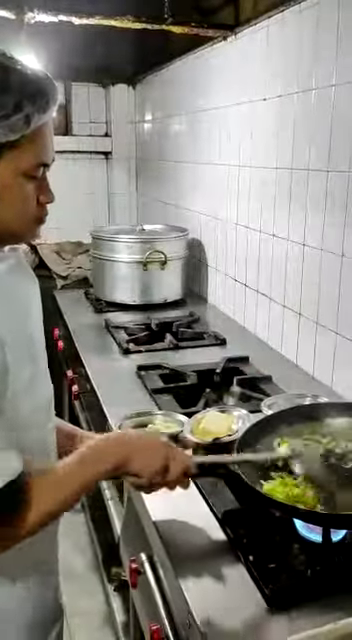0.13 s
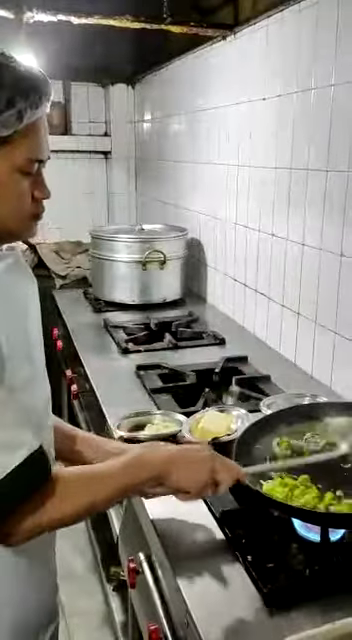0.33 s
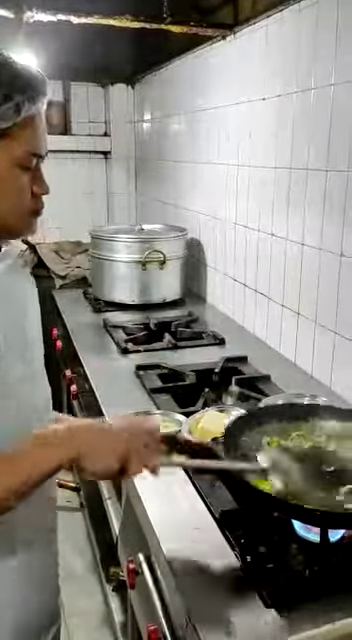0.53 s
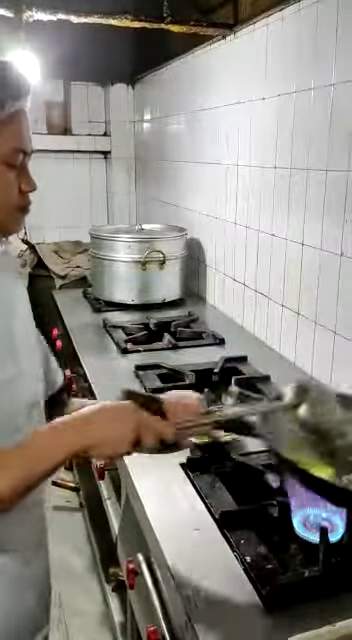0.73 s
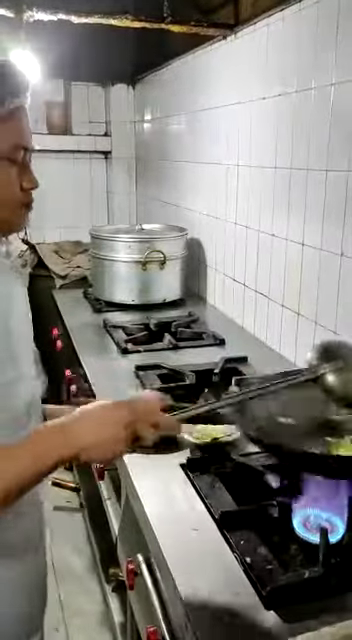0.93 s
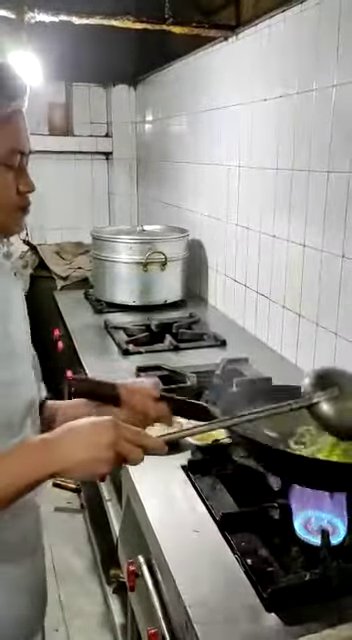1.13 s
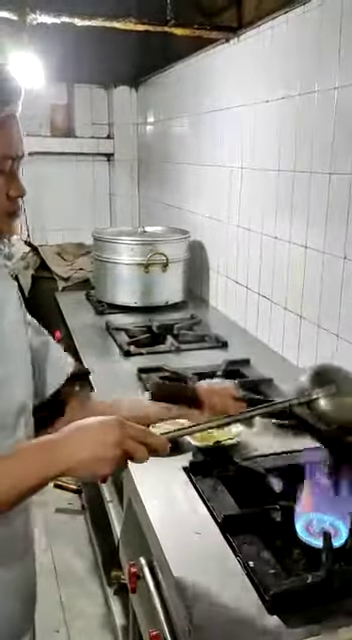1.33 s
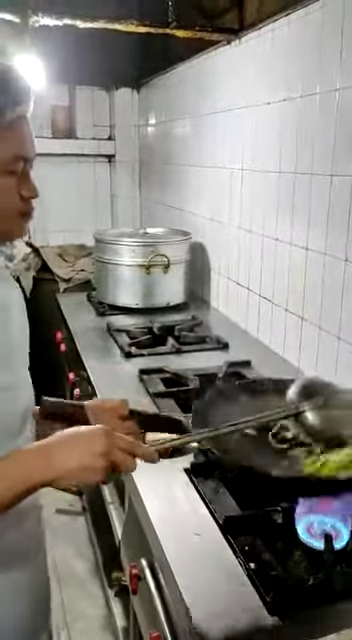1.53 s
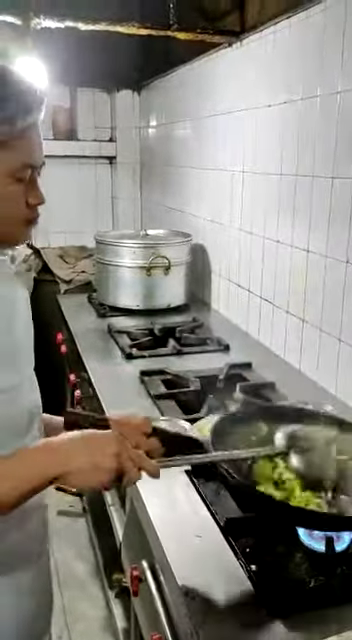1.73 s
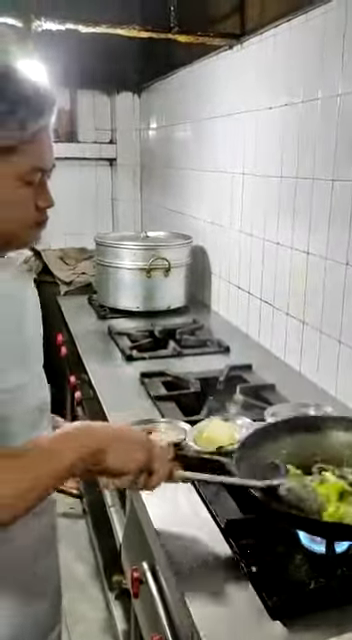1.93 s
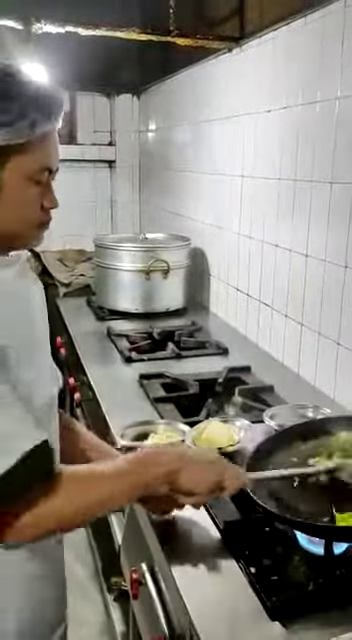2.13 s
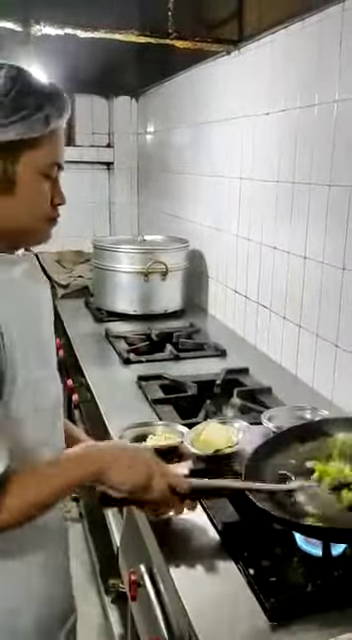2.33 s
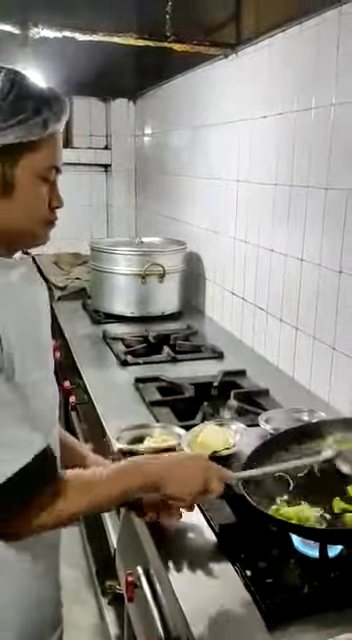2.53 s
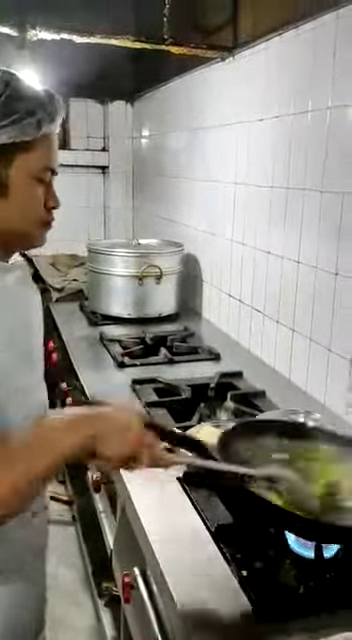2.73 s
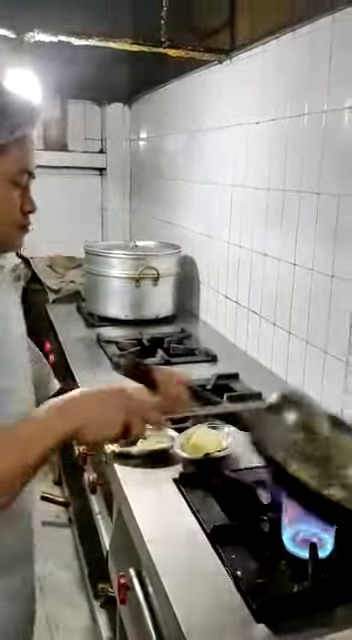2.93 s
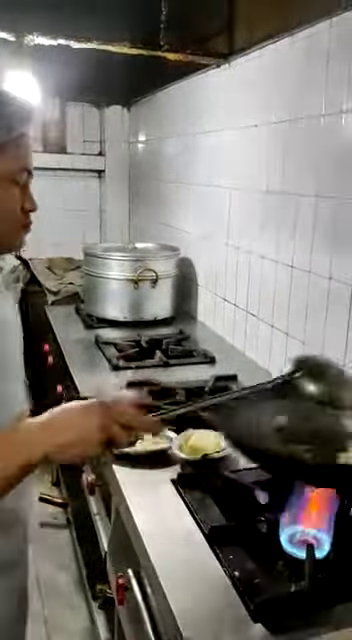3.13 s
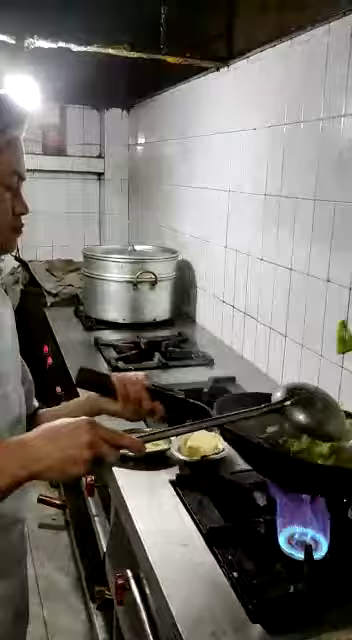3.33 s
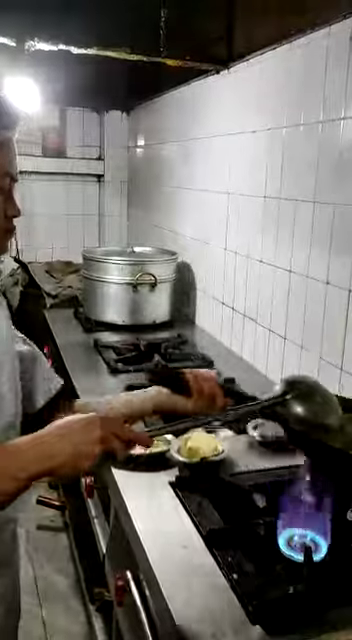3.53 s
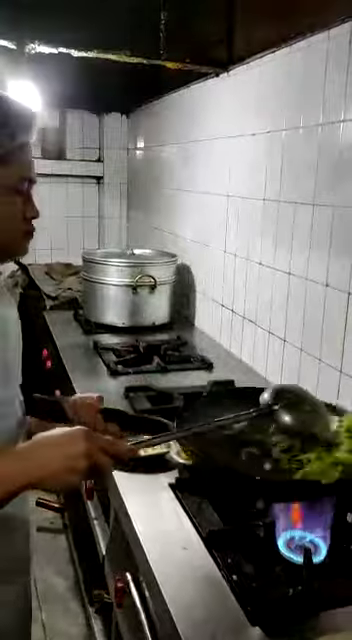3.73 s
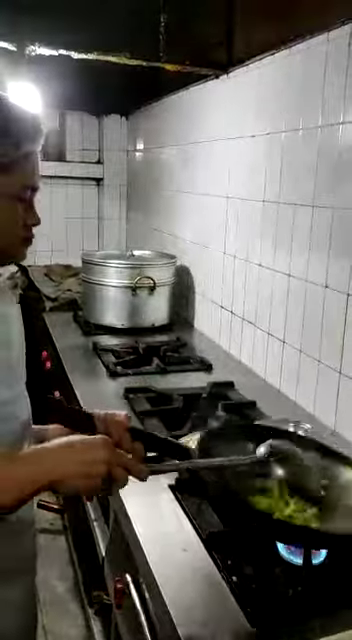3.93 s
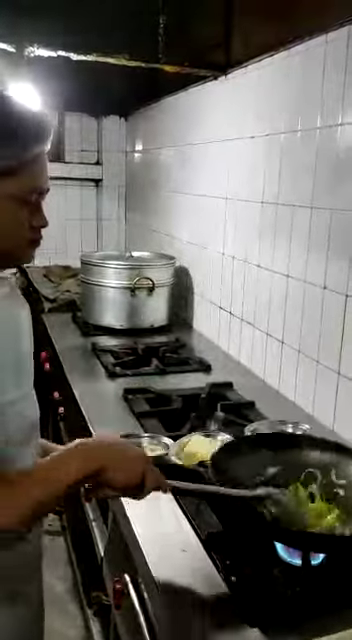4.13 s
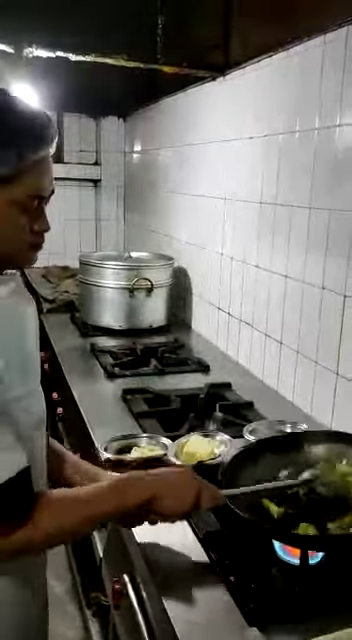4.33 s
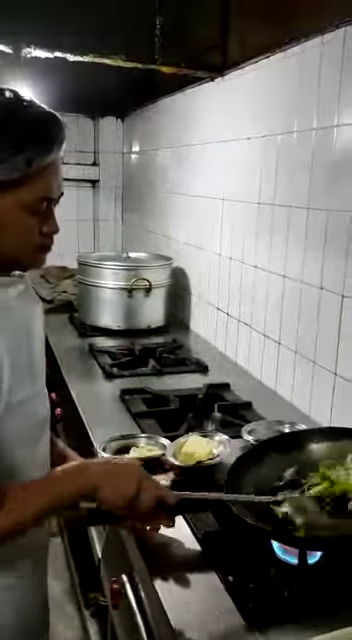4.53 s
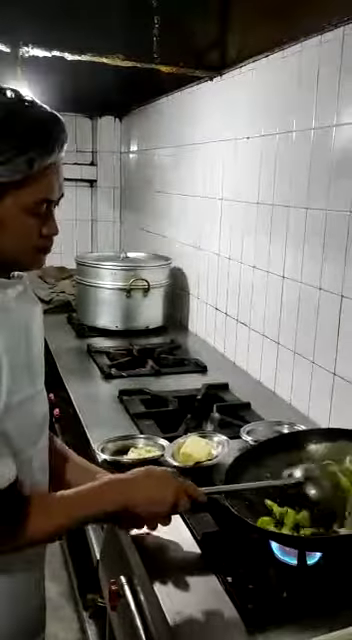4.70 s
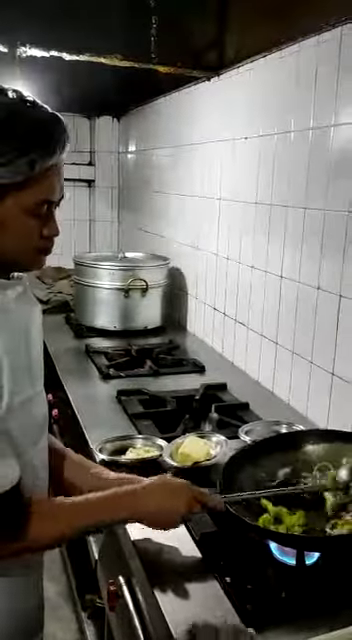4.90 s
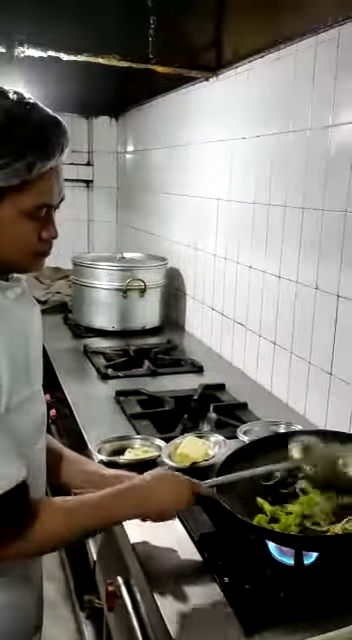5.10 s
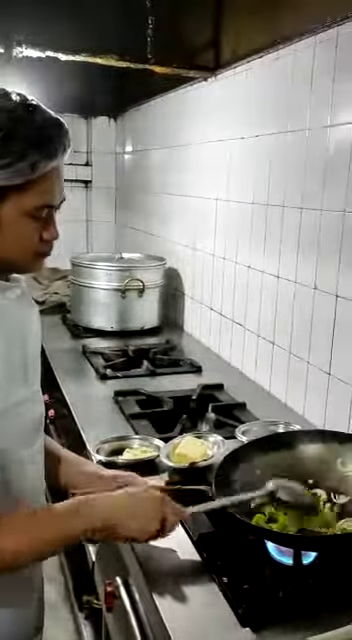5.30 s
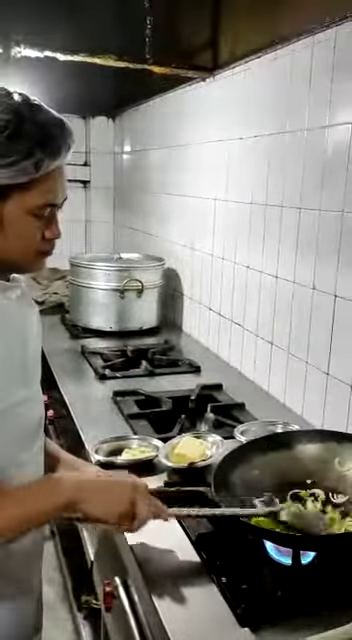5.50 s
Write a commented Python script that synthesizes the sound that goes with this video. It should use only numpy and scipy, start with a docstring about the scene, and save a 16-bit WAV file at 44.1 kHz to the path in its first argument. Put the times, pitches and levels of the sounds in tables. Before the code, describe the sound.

A bright crackling sizzle and gas hiss run throughout, dipping at times. A steel wok scrapes and thuds on the stove ring at around 0.7 seconds, again near 1.9, then in busier, louder clatters near 2.8 and 4.05, with smaller knocks near 5. A ladle chatters and clinks above it. Close stereo microphone, small hard tiled kitchen, faint motor throb early.

```python
"""A steel wok is dragged and tossed on a stove ring: it judders and rings low, as rough pushes stir its modes.
A steel ladle chatters and clinks high, from random clicks and short blows, and tiled walls echo the steel.
Frying food and the gas jet hiss on top, made of shaped noise with lulls, short bursts and bursting drops.
Outside the room a slow motor throbs for the first seconds, a few wavering sine tones.
Under it all lies the rumble of the kitchen, shaped noise that swells slowly."""
import sys
import numpy as np
from scipy import signal
from scipy.fft import rfft, irfft, next_fast_len
from scipy.io import wavfile
from scipy.ndimage import uniform_filter1d

SR = 44100
rng = np.random.default_rng(int(sys.argv[2]) if len(sys.argv) > 2 else 0)


def transcribe(signal):
    """Save signal, clipped to [-1, 1], as a 16-bit WAV file at the path in sys.argv[1]."""
    frames = np.atleast_2d(signal).T
    limited = np.clip(frames, -1, 1)
    pcm = np.round(limited * 32767).astype(np.int16)
    wavfile.write(sys.argv[1], SR, pcm)


N = 245195  # length in samples


def undb(db):
    """Turns a level in dB into a gain."""
    return 10 ** (np.asarray(db) / 20)


def unit(x):
    """Scales a sound to an rms (average strength) of 1."""
    return x / np.sqrt(np.mean(x ** 2))


def columns(table):
    """Draws straight lines between a table's rows, one curve for each column after the time."""
    seconds, *rest = np.transpose(table)
    return [np.interp(np.arange(N) / SR, seconds, column) for column in rest]


def walk(rate):
    """Smooth random wandering with a spread near 1: levels held for 1 / rate seconds, averaged twice."""
    hold = int(SR / rate)
    steps = np.repeat(rng.standard_normal(N // hold + 1), hold)
    smooth = uniform_filter1d(uniform_filter1d(steps, hold), hold)
    return 1.66 * smooth[:N]


def grains(rate, spread_db):
    """Random clicks, about rate of them a second, most small and a few large; rms 1."""
    when, sign, size = rng.random(N), rng.standard_normal(N), rng.exponential(size=N)
    height = np.clip(sign, -2, 2) * undb(spread_db * np.minimum(size, 4))
    return unit((when < rate / SR) * height)


def colour(x, points):
    """Shapes the spectrum by (Hz, dB) points without sounding early: nothing is heard before a blow."""
    hz, db = np.transpose(points)
    size = 2 * next_fast_len(N // 2 + 1)
    f = np.maximum(np.arange(size // 2 + 1) * SR / size, 1)
    curve_db = np.interp(np.log(f), np.log(np.maximum(hz, 1)), db)
    # folding the cepstrum (transform of the log spectrum) gives a minimum-phase filter
    cepstrum = irfft(np.log(undb(curve_db)), size)
    cepstrum[1:size // 2] *= 2
    response = np.exp(rfft(cepstrum[:size // 2 + 1], size))
    return irfft(rfft(x, size) * response, size)[..., :N]


def strokes(table, fade_db_per_s):
    """Gains of strokes that rise, hold and fade; columns after the level are relative to it."""
    power, t = 0, np.arange(N) / SR
    for start, rise, hold, db, *rest in table:
        attack = np.clip((t - start) / max(rise, .002), 0, 1)
        fade = undb(-fade_db_per_s * np.maximum(t - start - rise - hold, 0))
        levels = undb([[db]] + [[db + r] for r in rest])
        power = power + (attack * fade) ** 2 * levels ** 2
    return np.sqrt(power)


def blows(table, relative=False, snap=0):
    """A rough push at each event, sudden and dying away over its contact length; snap adds a first click."""
    push, clicks = np.zeros(N), np.zeros(N)
    for s, db, relative_db, length_s in table:
        i = int(s * SR)
        t = np.arange(min(N - i, SR // 4)) / SR
        gain = undb(db + relative * relative_db)
        push[i:i + len(t)] += gain * np.exp(-t / max(length_s, .001))
        clicks[i] = snap * gain
    return push * rng.standard_normal(N) + clicks


def favoured(force, events, lift_db, width_hz):
    """Adds a resonance at the frequency favoured by the latest contact; lift_db is its own gain."""
    events = sorted(events)
    starts = [int(s * SR) for s, _ in events] + [N]
    out = force.copy()
    for (_, hz), a, b in zip(events, starts, starts[1:]):
        peak = signal.iirpeak(hz, hz / width_hz, fs=SR)
        out[a:b] += undb(lift_db) * signal.lfilter(*peak, force[a:b])
    return out


def ring(force, modes, drift):
    """Modes die away, detuned by the shifting load, with a moving phase between channels.

    Each mode is (Hz, dB, seconds to fall 60 dB); steady noise of rms 1 gives about rms 1 before the high-pass.
    """
    out, power = 0, 0
    for hz, db, t60 in modes:
        pole = np.exp(2j * np.pi * hz / SR - np.log(1000) / (t60 * SR))
        gain = undb(db) * np.sqrt(2 * (1 - abs(pole) ** 2))
        detune = 2 * np.pi * np.cumsum(drift * hz * walk(25)) / SR
        apart = min(hz / 700, 2.5) * walk(4)  # phase between left and right
        z = signal.lfilter([gain], [1, -pole], force)
        left = (z * np.exp(1j * detune)).imag
        right = (z * np.exp(1j * (detune + apart))).imag
        out = out + np.array([left, right])
        power += undb(db) ** 2
    high_pass = signal.butter(4, 70, "high", fs=SR, output="sos")
    return signal.sosfilt(high_pass, out) / np.sqrt(power)


def sizzle_db():
    """Moving level of the frying and gas hiss, with smooth lulls and short bursts."""
    # Each row: time in seconds, base level in dB.
    slow_level = [(0.0, -22.5), (0.43, -22.5), (0.6, -20.5), (0.7, -23), (1.0, -19.5), (1.25, -18),
                  (1.5, -18), (1.78, -22.5), (2.12, -24), (2.5, -21), (2.76, -21.5), (3.17, -19.5),
                  (3.6, -23.5), (4.0, -22), (4.4, -21.5), (4.55, -27), (4.9, -25), (5.1, -23),
                  (5.56, -21.5)]
    # The sizzle sags while the food is tossed or turned off the hot steel.
    # Each row: middle in seconds, depth in dB, half length in seconds.
    lull_table = [(1.114, -6.5, 0.051), (1.38, -2, 0.059), (1.627, -7.5, 0.085), (2.39, -3.5, 0.065),
                  (2.909, -2.5, 0.045), (3.064, -2, 0.036), (3.334, -13.5, 0.12), (3.866, -8.5, 0.063),
                  (4.127, -2, 0.036), (4.237, -1.5, 0.034), (4.948, -3, 0.03), (5.28, -3.5, 0.08),
                  (5.505, -4, 0.049)]
    # Short hissy bursts, most of them the bright crack of a ladle or pan knock.
    # Each row: start in seconds, rise in dB before decay.
    burst_table = [(2.199, 5), (2.79, 8), (2.98, 2.5), (4.041, 6), (4.16, 6.5), (4.992, 10)]
    attack_s, decay_s = 0.0023, 0.021
    t = np.arange(N) / SR
    lulls = sum(db * np.exp(-((t - s) / half) ** 2) for s, db, half in lull_table)
    bursts = 0
    for s, db in burst_table:
        attack = np.clip((t - s) / attack_s, 0, 1)
        bursts = bursts + db * attack * np.exp(-np.maximum(t - s, 0) / decay_s)
    return columns(slow_level)[0] + lulls + bursts


def spit(rate, spread_db, share):
    """Dense bursting droplets in steam noise: part reaches the left channel later, the rest is diffuse."""
    left_lag = 12  # samples
    direct = grains(rate, spread_db) + 0.55 * rng.standard_normal(N)
    near = np.array([np.roll(direct, left_lag), direct])
    diffuse = undb(1.0 * walk(20)) * rng.standard_normal((2, N))
    return share * near + diffuse


def hiss():
    """A bright sizzle, strongest near 9 kHz, over a duller steam hiss, with lone bursting drops."""
    # Tone of the bright sizzle and drops. Each row: frequency in Hz, strength in dB per Hz.
    bright_colour = [(2000, -26.5), (3100, -25), (3350, -15.5), (4400, -15), (5500, -11.5), (7000, -11),
                     (8000, -5), (8800, 3), (9700, -2.5), (10500, -1), (12000, -7), (14400, -11),
                     (15000, -10.5)]
    # Tone of the dull steam hiss. Each row: frequency in Hz, strength in dB per Hz.
    dull_colour = [(600, -35), (1000, -9.5), (1700, -2), (2500, 5), (3500, -1), (6000, -7), (8000, -38)]
    # Each row: frequency in Hz, left minus right in dB.
    balance = [(700, 1.5), (2300, 1), (4300, 3), (7900, -10), (10500, 4.5), (14500, 5)]
    bright_db, dull_db, pop_db = 3.0, -19.5, -15.5  # relative to the moving level
    pop_rate_hz, pop_length_s = 60, .001
    level_db = sizzle_db()
    bright = unit(colour(spit(5000, 4.2, 0.34), bright_colour)) * undb(level_db + bright_db)
    dull = unit(colour(spit(3000, 1.6, 0.3), dull_colour)) * undb(level_db + dull_db)
    spurt = np.exp(-np.arange(SR // 100) / SR / pop_length_s)
    spurts = signal.fftconvolve(np.abs(grains(pop_rate_hz, 3.)), spurt)[:N]
    pops = spurts * rng.standard_normal((2, N))
    pops = unit(colour(pops, bright_colour)) * undb(level_db + pop_db)
    left, right = bright + dull + pops
    left = colour(left, [(hz, db / 2) for hz, db in balance])
    right = colour(right, [(hz, -db / 2) for hz, db in balance])
    return np.array([left, right])


def motor():
    """A few wavering tones near multiples of the firing rate, fading out."""
    # Each row: time in seconds, firing rate in Hz, level in dB, overtones relative to it in dB.
    course = [(0.0, 31.02, -56.5, 10.5), (0.5, 32.53, -47, 4.5), (1.1, 32.76, -45, 7.5),
              (1.3, 33.6, -47, 0), (1.55, 33.36, -40, -2), (1.9, 34.83, -46, -1), (2.15, 36.5, -47, 7),
              (2.7, 34.4, -56, -8), (3.2, 35.1, -45, 14)]
    # Each row: multiple of the firing rate, level within the overtones in dB.
    overtones = [(2, -3.5), (3, -2.5), (4, -8), (5, -10.5), (6, -8.5)]
    hz, level_db, over_db = columns(course)
    turn = 2 * np.pi * np.cumsum(hz * (1 + 0.00877 * walk(6.1))) / SR
    # the lowest tone sits slightly below the firing rate
    orders = [(0.97, level_db)] + [(k, level_db + over_db + db) for k, db in overtones]
    tones = sum(undb(db + 2.7 * walk(5.42)) * np.sin(k * turn + k * k) for k, db in orders)
    fade = np.clip((course[-1][0] - np.arange(N) / SR) / 0.21, 0, 1)
    return fade * np.sqrt(2) * tones


def kitchen():
    """Flame and fan rumble that swells slowly; the channels differ mostly higher up."""
    # Each row: frequency in Hz, strength in dB per Hz.
    rumble_colour = [(20, 2), (35, -15), (59, 10), (100, -4), (130, 5.5), (185, 8), (220, -1.5), (315, 0.5),
                     (400, -8), (600, -4), (900, -11), (1300, -21), (2500, -49)]
    # Each row: time in seconds, level in dB around which the swell moves.
    rumble_level = [(0, -35.5), (0.5, -39.5), (1.3, -43), (2.5, -41), (3.4, -41.5), (3.7, -41.5),
                    (4.8, -43), (5.56, -42.5)]
    mid = colour(rng.standard_normal(N), rumble_colour)
    side = colour(rng.standard_normal(N), rumble_colour)
    side = colour(side, [(60, -11.0), (250, -18.0), (600, -1.5), (2000, -1)])
    swell_db = 1.2 * walk(4)
    return unit(np.array([mid + side, mid - side])) * undb(columns(rumble_level)[0] + swell_db)


def pan():
    """Stick-slip judder on the ring and single bumps shake the bowl, its rim and the stove top."""
    # Pan sliding on the ring. Each row: start, rise and hold in seconds, level in dB before mixing,
    # rim ring and stove top relative to it in dB, favoured frequency in Hz.
    drags = [(0.117, 0.033, 0.063, -36, -1, -19, 585), (0.598, 0.02, 0.15, -29, -2, -8, 400),
             (0.677, 0.008, 0.05, -27, -6, -20, 323), (0.741, 0.0042, 0.025, -19, -5, 4, 270),
             (1.8, 0.0079, 0.012, -24, -4, -0.5, 400), (1.87, 0.059, 0.18, -27.5, -1.5, -3.5, 300),
             (2.422, 0.041, 0.015, -39, -1, -12, 503), (2.678, 0.031, 0.06, -42.5, 4.5, -15, 450),
             (2.793, 0.049, 0.12, -21.5, -6, -13, 260), (4.046, 0.014, 0.15, -26, -3, -9, 350),
             (4.247, 0.029, 0.082, -25, -5, -1.5, 368), (4.453, 0.019, 0.07, -36.5, -7, -11, 374),
             (4.646, 0.019, 0.035, -38, -0.5, -9, 380), (4.996, 0.006, 0.071, -27, -12, -10, 303)]
    # Pan bumping the ring. Each row: start in seconds, blow in dB before mixing,
    # rim ring relative to it in dB, contact length in seconds.
    bumps = [(0.599, -19.5, -9, 0.012), (0.679, -17, -3.5, 0.013), (0.742, -8, -2, 0.008),
             (0.761, -17, -8, 0.006), (0.819, -16, -20, 0.008), (0.88, -19.5, -10, 0.0074),
             (1.801, -16, -2.5, 0.0058), (1.87, -24, -24, 0.0044), (1.903, -20, -1, 0.023),
             (1.955, -22, 7, 0.017), (2.009, -11.5, -4.5, 0.0053), (2.792, -23.5, 3.5, 0.0074),
             (2.838, -9, -9, 0.006), (2.859, -12.5, -13, 0.005), (2.879, -12, -5, 0.005),
             (2.907, -14, -13, 0.0045), (2.918, -10.5, -20, 0.0046), (2.942, -12, -22, 0.0047),
             (2.958, -12, -20, 0.0055), (4.0405, -3, -11, 0.0054), (4.059, -6.5, -12, 0.005),
             (4.066, -13, -14, 0.004), (4.082, -13.5, -16, 0.0054), (4.119, -12.5, -5, 0.0071),
             (4.158, -11, -10, 0.006), (4.268, -17, 1, 0.012), (4.29, -18, -5, 0.006),
             (4.666, -25.5, -5, 0.012), (4.997, -14.5, -20, 0.008), (5.016, -19, -20, 0.0054),
             (5.042, -21.5, -9, 0.006), (5.066, -21, -18, 0.006), (5.216, -32, 6, 0.0029)]
    # Ringing of bowl, rim and stove top. Each row: frequency in Hz, level in dB within the group,
    # time to fall 60 dB in seconds.
    bowl_modes = [(194, -10, 0.27), (242.4, 1.5, 0.33), (265.4, -1.5, 0.23), (299, -2.5, 0.24),
                  (333.1, 0.5, 0.097), (375.5, 2, 0.18), (451.7, -1.5, 0.17), (498.4, -5, 0.13),
                  (542.6, -3.5, 0.18), (585, -6, 0.13), (660, -10.5, 0.08), (764, -8.5, 0.17)]
    rim_modes = [(841, 2.5, 0.024), (957, 4.5, 0.06), (1048, -5, 0.19), (1057, 1, 0.077), (1105, 0, 0.16),
                 (1148, -1, 0.29), (1306, -4.5, 0.18), (1491, -6.5, 0.074)]
    stove_modes = [(74.7, -11, 0.44), (139, 6, 0.29), (167, -9, 0.29)]
    # Rough grinding between the modes. Each row: frequency in Hz, level in dB.
    grind_colour = [(120, -3.5), (250, 13), (500, 10.5), (700, -15), (1100, -1.5), (1700, -7.5),
                    (2300, -17)]
    # Dull first thud of a bump. Each row: frequency in Hz, level in dB.
    thud_colour = [(150, -8), (330, -1), (600, -1), (1100, -14), (2500, -30)]
    snap_db = 21  # first instant of a bump over the rough contact that follows

    bowl, rim, stove = strokes([d[:-1] for d in drags], 174)  # fades at 174 dB per second
    judder = undb(0.61 * walk(40)) * (grains(900, 1.2) + 0.74 * rng.standard_normal(N))
    slide = favoured(bowl * judder, [(d[0], d[-1]) for d in drags], lift_db=4.5, width_hz=82)
    thud = undb(-9) * colour(blows(bumps, snap=undb(11.0)), thud_colour)
    bowl_force = undb(-8.0) * slide + undb(-10.5) * blows(bumps, snap=undb(snap_db))
    rim_bumps = blows(bumps, relative=True, snap=undb(snap_db - 7.5))
    rim_force = undb(-7.5) * rim * judder + undb(-3.5) * rim_bumps
    stove_force = undb(-6.0) * stove * judder + undb(-12.5) * blows(bumps)

    rough = bowl_force + rim_force
    # noise of opposite sign left and right widens the grinding
    wide = colour(rough * rng.standard_normal(N), [(200, -25), (600, -1.5), (2000, -2)])
    grind = colour(np.array([rough + wide, rough - wide]), grind_colour)
    ringing = ring(bowl_force, bowl_modes, .04) + ring(rim_force, rim_modes, .025)
    return ringing + ring(stove_force, stove_modes, 0.0055) + grind + thud


def ladle():
    """Chatter and knocks rasp broadly and stir the ladle's modes, damped by hand and food; each knock cracks."""
    # Ladle rubbing along the steel. Each row: start, rise and hold in seconds,
    # level in dB before mixing, favoured frequency in Hz.
    rubs = [(0.592, 0.0054, 0.03, -25.5, 4400), (1.892, 0.074, 0.092, -26, 4000),
            (2.129, 0.025, 0.015, -26, 3750), (2.787, 0.005, 0.034, -21.5, 3750),
            (2.828, 0.0087, 0.03, -28.5, 3550), (4.04, 0.005, 0.017, -23.5, 3700),
            (4.147, 0.012, 0.027, -23, 4000), (4.247, 0.015, 0.018, -30.5, 3640),
            (4.32, 0.015, .015, -31, 3670), (4.644, 0.018, 0.016, -30, 3560),
            (4.996, 0.0038, 0.076, -24.5, 4200), (5.308, 0.019, .04, -34, 2860)]
    # Ladle knocking the pan. Each row: start in seconds, blow in dB before mixing,
    # treble crack relative to it in dB, contact length in seconds, favoured frequency in Hz.
    knock_table = [(0.593, -22, -1, 0.025, 3600), (0.742, -25, -6, 0.015, 3650),
                   (0.961, -37, 13.5, 0.02, 4500), (1.959, -21.5, -1.5, 0.03, 4420),
                   (2.785, -13.5, -5.5, 0.012, 3650), (2.796, -19, -7, 0.014, 3700),
                   (2.809, -18, -5, 0.014, 3630), (2.846, -14.5, -3, 0.021, 3650),
                   (2.883, -25, -12, 0.014, 3550), (3.593, -33, -12, 0.012, 3580),
                   (4.04, -17.5, -5, 0.025, 3620), (4.159, -18, 1.5, 0.029, 5300),
                   (4.275, -21, -12, 0.015, 3600), (4.992, -17.5, -2.5, 0.008, 4130),
                   (4.999, -20.5, -1, 0.027, 4100)]
    # Ringing of the ladle, all dying alike. Each row: frequency in Hz, level in dB within the group.
    ladle_modes = [(2480, -4), (2850, -2), (3240, 3), (3630, 5), (3900, -2.5), (4130, -1.5), (4400, 2.5),
                   (4880, 6), (5290, 3.5), (5500, -8), (5850, 2), (6130, 2.5)]
    # Tone of the broad rasp. Each row: frequency in Hz, level in dB.
    rasp_colour = [(1500, -15), (2400, -1), (3100, -14.5), (3400, -6.5), (4500, -1.5), (6000, -34),
                   (8000, -40)]
    t60_s = 0.073  # time for every mode to fall 60 dB
    contact_db, contact_width_hz = 6.5, 296  # resonance added by the place of contact
    tick = undb(12.)  # first tick of a knock over its rough contact

    chatter = strokes([r[:-1] for r in rubs], 135)[0]  # fades at 135 dB per second
    chatter = chatter * undb(2 * walk(60)) * grains(3500, 1.5)
    chatter = favoured(chatter, [(r[0], r[-1]) for r in rubs], contact_db, contact_width_hz)
    hits = [k[:-1] for k in knock_table]
    places = [(k[0], k[-1]) for k in knock_table]
    knocks = favoured(blows(hits, snap=tick), places, contact_db, contact_width_hz)
    rasp = colour(undb(-6.5) * chatter + undb(-2.5) * knocks, rasp_colour)
    crack = blows(hits, relative=True, snap=tick)
    crack = colour(crack, [(4000, -5), (7000, 2.0), (9000, 6.0), (15000, -37)])
    force = undb(-8.0) * chatter + undb(-7.5) * knocks
    return ring(force, [(hz, db, t60_s) for hz, db in ladle_modes], .02) + rasp + crack


def room(x):
    """Tiled walls add a decaying noise tail, much alike in both channels in the bass."""
    t60_s, tail_db, split_hz = .6, -3, 600
    t = np.arange(int(t60_s * SR)) / SR
    decay = 1000. ** (-t / t60_s) * np.minimum(t / 0.0046, 1)  # builds up over 4.6 ms
    low, left, right = rng.standard_normal((3, len(t))) * decay
    b, a = signal.butter(1, split_hz, fs=SR)
    # below the split, each side's own noise gives way to the shared one
    tail = np.array([side + signal.lfilter(b, a, low - side) for side in (left, right)])
    tail = tail / np.sqrt(np.sum(tail ** 2, axis=1, keepdims=True))
    return x + undb(tail_db) * signal.fftconvolve(x, tail, axes=1)[:, :N]


def scene():
    """Steel in the room, a little to the left, with the steady sounds around it."""
    left_over_right_db = 1.2
    steel = room(pan() + ladle()) * undb([[left_over_right_db / 2], [-left_over_right_db / 2]])
    return steel + hiss() + motor() + kitchen()


def record(dry):
    """Soft limiting rounds the loudest peaks, then a steep low-pass cuts the top."""
    low_pass = signal.ellip(12, .3, 70, 14230, fs=SR, output="sos")  # cuts above 14230 Hz
    return signal.sosfilt(low_pass, np.tanh(dry))


dry = scene()
out = record(dry)
transcribe(out)
```